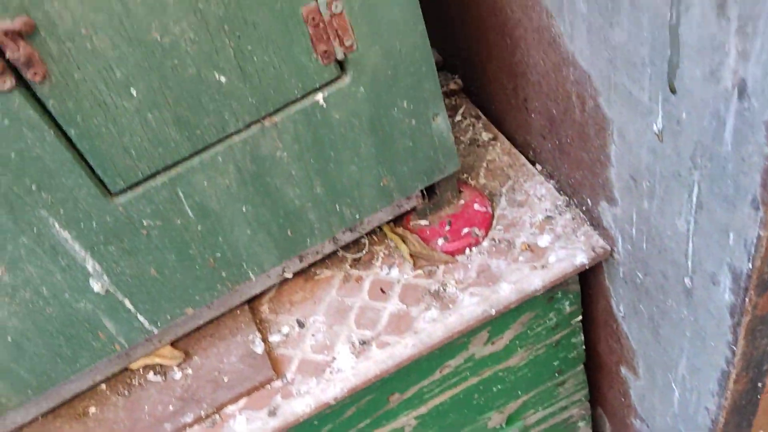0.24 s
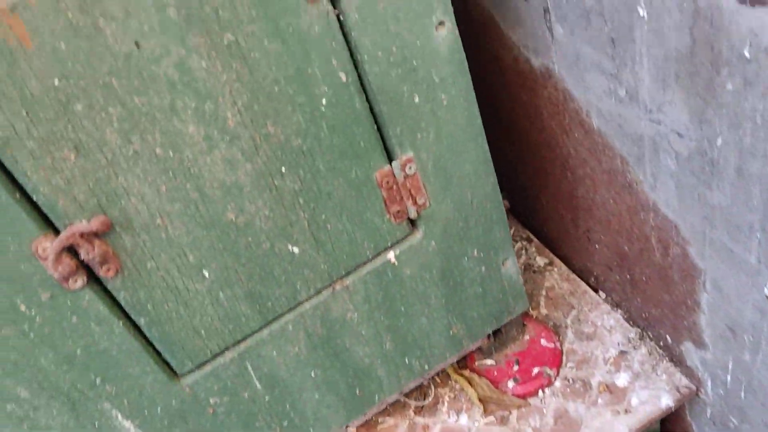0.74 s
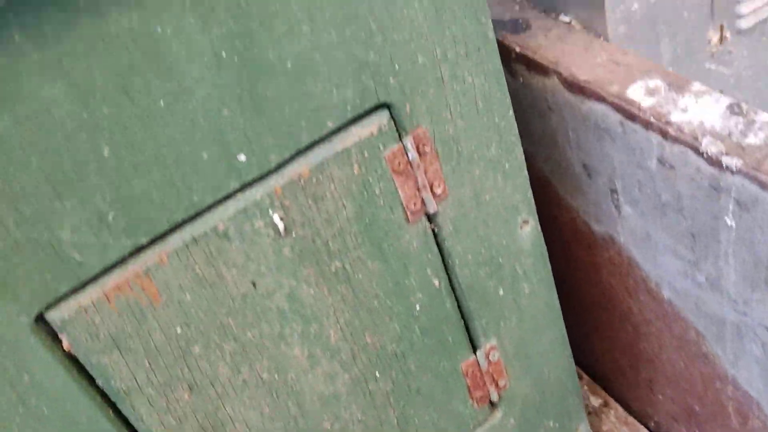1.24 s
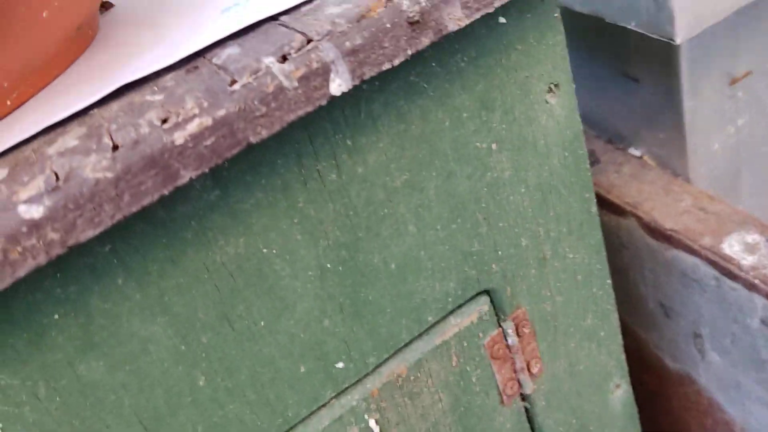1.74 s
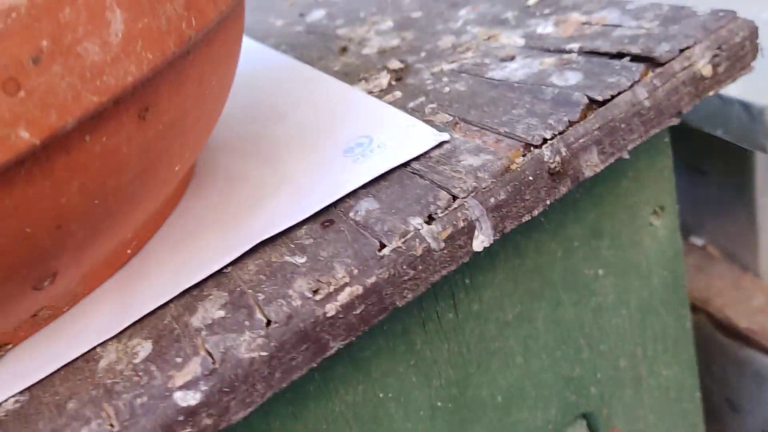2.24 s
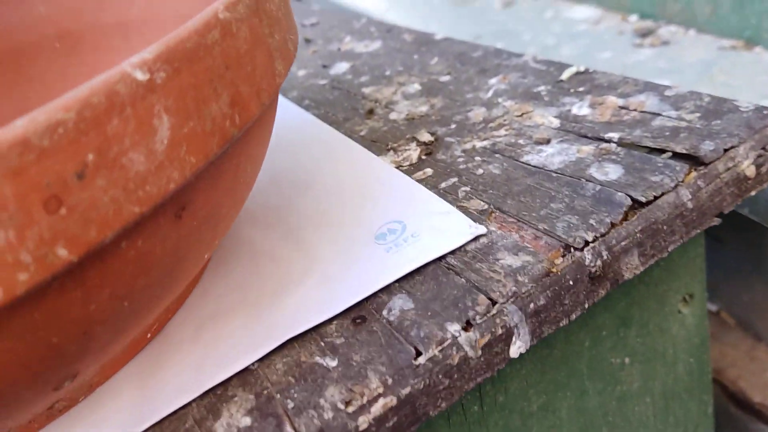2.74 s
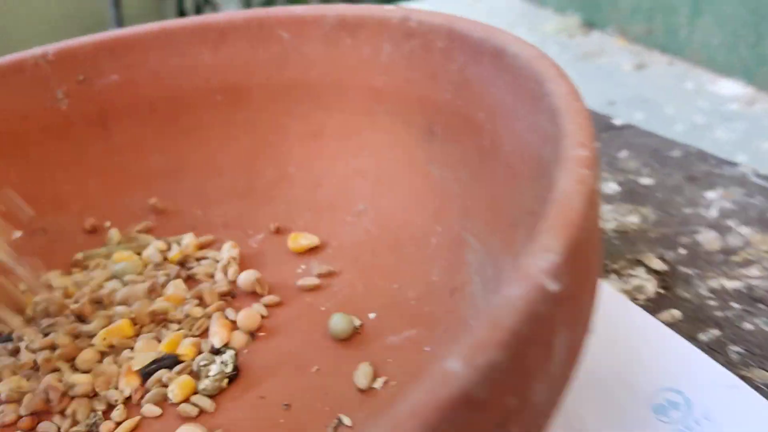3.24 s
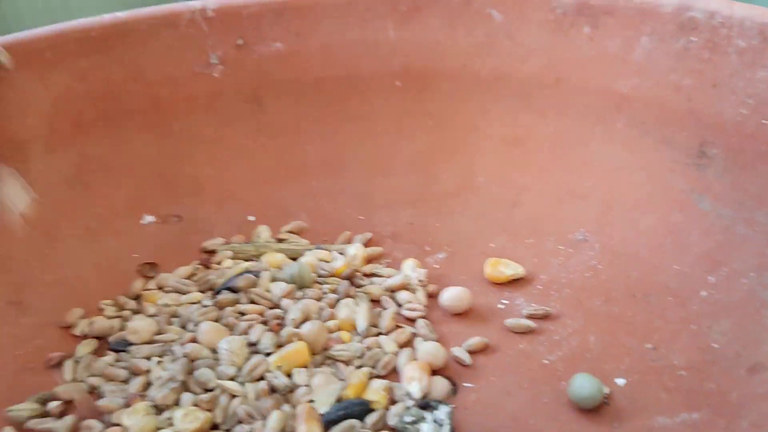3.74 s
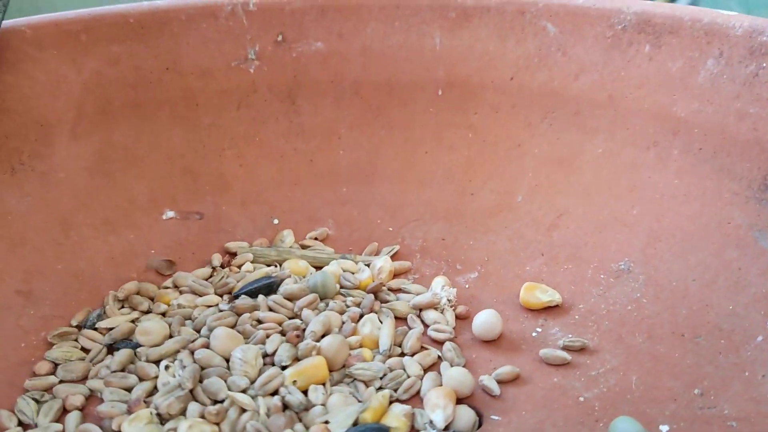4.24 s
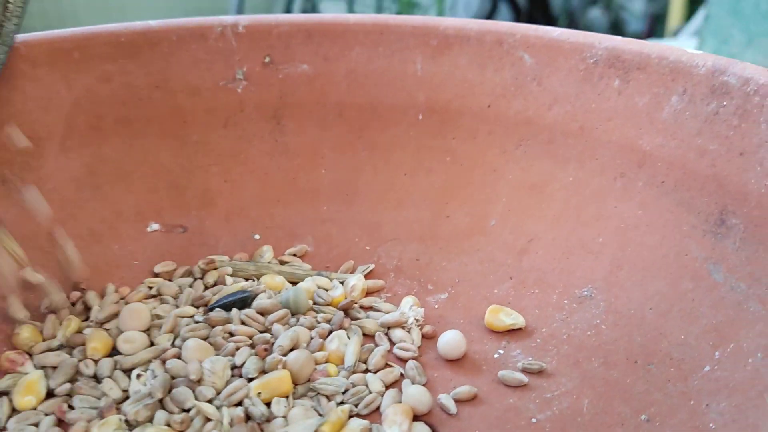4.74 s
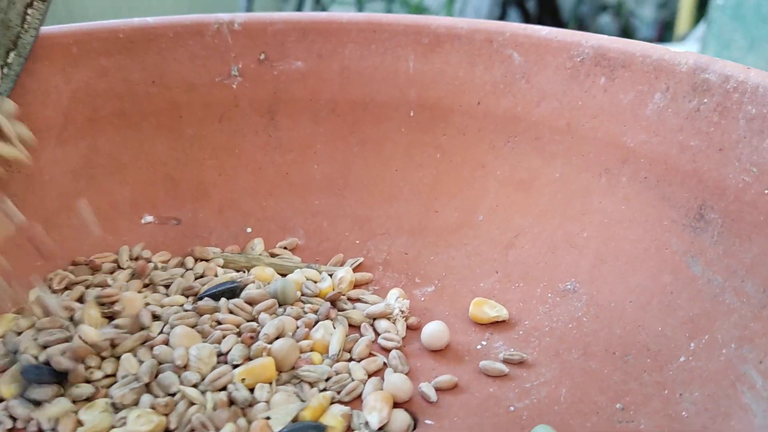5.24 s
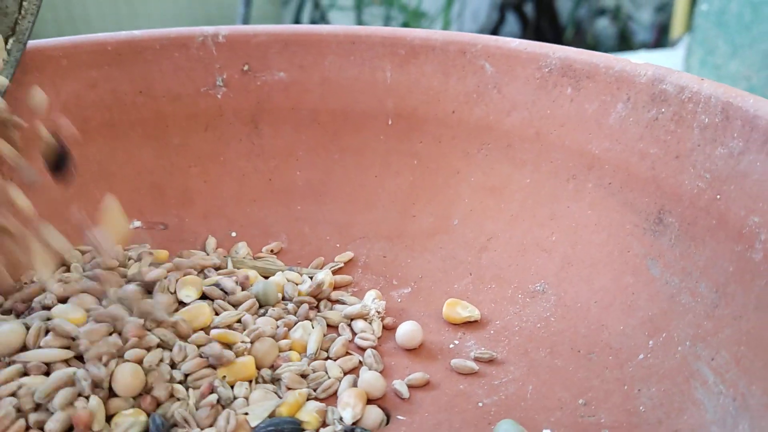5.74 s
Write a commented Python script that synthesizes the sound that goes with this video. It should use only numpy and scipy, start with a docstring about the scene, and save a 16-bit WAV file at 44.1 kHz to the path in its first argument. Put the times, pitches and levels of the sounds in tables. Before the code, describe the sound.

Dry mixed seed rustles in a scoop, then pours into a clay dish, pattering and ticking in a quiet yard.

```python
"""A rustle of dry mixed seed sliding in a scoop comes first, then a pour into a clay dish just right
of a two-microphone phone. Seeds rustle by colliding with each other; single kernels tick and excite
the modes of the clay, which dulls as seed covers it. A far dog yaps, a pigeon coos low, the phone
is bumped, and a quiet yard hums behind."""
import sys
import numpy as np
from scipy import signal
from scipy.fft import rfft, irfft
from scipy.io import wavfile
from scipy.ndimage import uniform_filter1d

SR = 44100
rng = np.random.default_rng(int(sys.argv[2]) if len(sys.argv) > 2 else 0)


def to_wav(sig):
    """Store sig (one row per channel, or 1-D mono) as 16-bit WAV at the path in sys.argv[1].

    Samples outside -1..1 are clipped; the rate is SR.
    """
    pcm = np.clip(np.atleast_2d(sig), -1, 1) * 32767
    pcm = np.round(pcm).astype(np.int16)
    wavfile.write(sys.argv[1], SR, pcm.T)  # frames by channels


N = 264929
T = np.arange(N) / SR

# Slides of seed as the scoop digs, tips or shakes:
# (end of swell [s], hold [s], rise [dB/s], fall [dB/s], fine level [dB], coarse above fine [dB])
SLIDES = [(0.166, 0.028, 283, 400, -54, 6), (0.291, 0.084, 463, 400, -36.5, -0.5),
          (0.362, 0.047, 207, 400, -47.5, 13.5), (0.47, 0.24, 302, 96, -39.5, -4.5),
          (0.827, 0.057, 210, 64, -24.5, -13.5), (1.31, 0.043, 157, 77, -47, -8.5),
          (1.578, 0.057, 96, 117, -29, -14), (1.673, 0.032, 114, 199, -26, -24),
          (1.776, 0.047, 129, 80, -29.5, -15), (2.092, 0.43, 75, 103, -43.5, -6),
          (2.712, 0.072, 125, 104, -30.5, -11), (2.93, 0.39, 61, 43, -33, -8.5),
          (3.74, 0.012, 207, 252, -36.5, -11), (3.968, 0.14, 150, 300, -49.5, -7),
          (4.447, 0.033, 225, 59, -47, -2.5), (4.617, 0.17, 156, 64, -37, -10),
          (5.017, 0.16, 57, 40, -44.5, -4), (5.192, 0.025, 67, 42, -37.5, -11.5),
          (5.36, 0.03, 128, 73, -30, -9.5), (5.514, 0.039, 120, 138, -31.5, -15),
          (5.654, 0.029, 206, 106, -25, -14), (5.886, 0.039, 68, 76, -33, -10.5)]
# Spectra of fine seed, coarse kernels and a contact's snap: (frequency [Hz], relative level [dB])
FINE_SPECTRUM = [(1000, -42.5), (2500, -15), (3300, -11), (4200, -7), (6000, 0.5), (7200, 0), (8500, 0),
                 (9700, 5), (12000, -3.5), (14500, -14)]
COARSE_SPECTRUM = [(500, -16.5), (900, -10.5), (1250, -12.5), (1600, -0.5), (2200, 2.5), (2800, -6),
                   (3400, -0.5), (5000, -3), (9000, -11.5)]
SNAP_SPECTRUM = [(1500, -20), (2500, -8), (4000, -2), (7000, 3), (8700, -2), (11000, 4), (14500, 4)]
# Ticks in the scoop: (time [s], relative level [dB], left minus right [dB])
SCOOP_TICKS = [(.3481, -30, 13), (.4566, -31, -11), (.5389, -18.5, -13), (.5781, -25.5, -5),
               (.6167, -13.5, -6.5), (.6459, -15, -2), (.6902, -8, -7), (.7023, -16, 3), (.7565, -34, -1),
               (.7676, -10.5, -8), (.827, -18, -13), (.87, -18, -18), (.9366, -20, -15), (1.0037, -14, -5),
               (1.0156, -15, -3), (1.045, -16.5, -1), (1.0708, -20, -3), (1.1065, -27, -8),
               (1.1457, -26.5, -7), (1.2518, -31, -7), (1.2664, -19, -4), (1.3343, -22, -8),
               (1.4274, -30, -14), (1.4474, -22, -2), (1.5159, -19.5, -14.5), (1.6931, -14.5, -4),
               (1.7247, -28, -12), (1.7923, -16, -11), (1.8109, -15.5, -2), (1.8784, -19, 6),
               (1.9114, -20, 1), (1.9357, -25.5, -11), (2.0165, -26, -3)]
# Kernels striking the clay: (time [s], relative level [dB], ring of each of four mode families
# from low to high against that level [dB], left minus right [dB])
KERNEL_IMPACTS = [(2.0317, -9.5, -5.5, -30.5, -11.5, -10.5, -5.5),
                  (2.0975, -17.5, -14, -23, -13.5, -20, -10), (2.243, -24.5, -9, -40, -20, -27, -5),
                  (2.263, -40, 7.5, -40, -8, -28, 1), (2.2945, -32.5, 4, -9, -4, -25, -2),
                  (2.3131, -19.5, -1, -20, -5.5, -17.5, -10), (2.3695, -26, -12, -20, -7, -15, -10),
                  (2.3876, -32.5, 9, -11, -15, -29, -2), (2.3973, -30, -40, -15, -0.5, -33, -10),
                  (2.454, -27, -15, -28, -21, -16, -5), (2.4882, -17, -13, -19, -16.5, -21, -1),
                  (2.5228, -24.5, -26, -18.5, -21, -19, -5), (2.561, -11.5, -44, -41, -30, -17, -4),
                  (2.6028, -30, -28, -33, -25, -19, -9), (2.627, -29, -16, -15, -7, -14, 1),
                  (2.6615, -10.5, -18, -17, -8.5, -23, -5), (2.742, -20.5, -23, -10, 0, -11, -1),
                  (2.7546, -6, -12, -19, -6.5, -17.5, 1), (2.8105, -8.5, -12, -10.5, -7, -22, -2),
                  (2.839, -26, -3.5, -8, -5, -21, -4), (2.847, -15.5, -39, -16, -1, -13.5, -3),
                  (2.8759, -13, -5.5, -10.5, -3, -28, -8), (2.8957, -11, -44, -38, -10, -23, -3),
                  (2.912, -10, -6.5, -16, -6, -15, -5), (2.9194, -7, -14, -14.5, -11, -27, -3),
                  (2.948, -19, -8, -9, -8, -13, -1), (2.977, -18.5, 0.5, -4.5, -5.5, -29, 1),
                  (3.0125, -20, -16, -3.5, -4, -13, -7), (3.0305, -10.0, -30, -18, -4, -18, -12),
                  (3.0684, -16.5, -6, -25, -6, -22, -11), (3.093, -17.5, -3, -40, -6, -20, -12),
                  (3.101, -16.5, -6, -33, -40, -18, -13), (3.121, -14, -8.5, -15, -11, -26, -10),
                  (3.1622, -17.5, -2.5, -15, -22, -33, -2), (3.3286, -17, -29, -17, -18, -23, -14),
                  (3.3855, -23.5, -14, -20, -12, -14, -12), (3.405, -20, -18, -12, -16, -14, -8),
                  (3.4244, -10.5, -28, -28, -40, -40, -8.5), (3.4536, -22, -40, -32, -35, -31, -10),
                  (3.4803, -17.5, -30.5, -23, -20.5, -18, -10), (3.4845, -26, -26, -9, -12, -40, -8),
                  (3.506, -9.5, -37, -28.5, -25, -18.5, -15), (3.5336, -33, -29, -40, -25, -22, -6),
                  (3.5628, -29, -9, -17, -5, -15, -8), (3.5668, -16.5, -40, -40, -20, -32, -11),
                  (3.6143, -28.5, -29, -12, -7.5, -13, -8), (3.653, -23.5, -17.5, -15, -9.5, -16.5, -3),
                  (3.685, -20.5, -24.5, -24, -10, -13, -11), (3.695, -6.5, -36, -32, -24, -25.5, 0),
                  (3.7166, -21.5, -36, -20, -9, -13, -9), (3.7463, -17.5, -48, -36, -17.5, -22, -7),
                  (3.7741, -17.5, -30, -22, -15, -14.5, -9), (3.7987, -42, -18, -13, -2, -15, -3),
                  (3.836, -23, -26, -19, -24, -32, -2), (3.849, -30, -40, -38, -10, -11, -6),
                  (3.8708, -19.5, -40, -15, -25, -29, -7), (3.8705, -25.5, -18, -20, -3, -20, -3),
                  (3.9056, -24, -26, -28, -15, -13, -7), (3.9494, -13.5, -42, -39, -22, -20, 1),
                  (3.964, -28, -38, -24, -8, -25, -7), (4.0525, -18, -44, -30, -27, -38, -8),
                  (4.067, -30, -36, -21, -5, -11, -1), (4.097, -32.5, -33, -21, -11, -13, -6),
                  (4.1875, -23.5, -36, -21, -10.5, -10, -2), (4.1981, -21, -35, -29, -18, -19, -3),
                  (4.2289, -26.5, -54, -23, -7, -16, -6), (4.2343, -22.5, -33, -29, -24, -16.5, 6),
                  (4.281, -43, -40, -31, -7, -19, -2), (4.3127, -25, -27, -30, -10.5, -16.5, -7),
                  (4.511, -26.5, -36, -36, -19, -19, 7), (4.5548, -28, -34, -28, -11.5, -19, 3),
                  (4.578, -16.5, -26, -27, -18, -13, -6), (4.59, -13, -31, -22, -10, -20, 1),
                  (4.608, -19.5, -44, -35, -7, -18, -3), (4.6302, -22.5, -40, -21, -10, -10, 0),
                  (4.6636, -20.5, -38, -31, -18, -15, -6), (4.6846, -21, -44, -33, -13, -12.5, -1),
                  (4.7083, -25, -36, -27, -21, -14, 1), (4.7248, -22, -38, -25, -15, -13, 2),
                  (4.7452, -13, -39, -25, -16.5, -16.5, -5), (4.7913, -20, -30, -36, -40, -40, -4),
                  (4.8375, -25.0, -42, -28, -13, -16, -4), (4.8669, -17.5, -34, -29, -16, -14.5, -6),
                  (4.898, -18, -38, -27, -20, -24, -6), (4.911, -21, -34, -33, -22, -18, 5),
                  (4.9465, -29.5, -33, -29, -7, -12, -1), (4.9613, -20.5, -25, -17, -10.5, -14, -1),
                  (5.043, -23, -35, -40, -26, -28, 3), (5.065, -26, -31, -32, -22, -21, -9),
                  (5.164, -36, -25, -25, -11, -24, -8), (5.175, -22, -35, -40, -20, -23, -3),
                  (5.1911, -21.5, -29, -20, -18, -21, 10), (5.2072, -19.5, -32, -29, -12.5, -18, -8),
                  (5.3813, -28, -32, -25, -15, -29, 4), (5.4946, -30, -32, -12, -14, -19, 2),
                  (5.553, -19, -37, -40, -40, -40, 3), (5.5997, -26, -34, -22, -13, -26, 9),
                  (5.616, -27, -29, -40, -40, -16, 1), (5.7253, -20, -32, -38, -24, -19, -12),
                  (5.749, -21, -22, -25, -23, -27, -14), (5.7687, -26, -42, -36, -16, -36, -11),
                  (5.8644, -25.5, -34, -24, -17, -18, -10), (5.965, -24, -27, -39, -42, -15, 0)]
# Natural frequencies of the dish: (frequency [Hz])
MODE_HZ = [1908, 3025, 3110, 4170, 4390, 4910, 5280, 5880, 5955, 6220, 6550, 6995, 7660, 8430, 8580, 8720,
           9150, 9900, 10250, 10470, 10600, 12000, 12410, 13600, 14100]
# The same modes: (T60 [s], excitation when bare [dB], when heaped [dB], left minus right [dB])
DISH_MODES = [(0.043, -4, -35, 1.5), (0.072, -10, -13.5, -5), (0.026, -11.5, -10, -8),
              (0.072, -14.5, -17, -11), (0.036, -10, -9.5, 10), (0.063, -20, -12.5, 3),
              (0.08, -11.5, -19, 6.5), (0.03, -8, -14, 14), (0.029, 0, -17, 0), (0.084, -18, -20, 14.5),
              (0.065, -13, -11.5, -5), (0.035, -22, -11.5, -7), (0.061, -21, -23.5, -6),
              (0.054, -24, -22, -5), (0.054, -23.5, -23, -9), (0.045, -15, -25, -9), (0.02, -45, -40, -4),
              (0.018, -25, -45, 20), (0.025, -16, -22, 5), (0.046, -19.5, -44, 1), (0.062, -24, -27, -24),
              (0.065, -58, -27.5, -13), (0.063, -22.5, -34, -20), (0.03, -41, -31, -6),
              (0.023, -21, -47, 17)]
# Drive of the stream on the clay: (time [s], level [dB])
CLAY_DRIVE = [(2.0, -65), (2.1, -51), (2.72, -45.5), (2.8, -33), (3.15, -29), (3.45, -43.5), (3.92, -55),
              (4.3, -76), (4.5, -52), (4.75, -49), (5.25, -40.5), (6.0, -43)]
# Hum of the air in the scoop: (time [s], level [dB])
CAVITY_HUM = [(.25, -62), (.302, -42.5), (.364, -66), (.474, -47), (.58, -55.5), (.92, -53.5), (1.1, -78)]
# Knocks of the digging scoop, and bumps on the phone: (time [s], level [dB], frequency [Hz])
SCOOP_KNOCKS = [(.292, -49, 445), (.321, -27, 1900), (.367, -28, 2500)]
PHONE_BUMPS = [(3.943, -26.5, 169), (4.009, -31, 400), (4.964, -24, 177), (5.225, -17.5, 227)]
# Calls of the dog and the pigeon: (start [s], duration [s], pitch [Hz], level [dB])
DOG_YAPS = [(3.2, 0.092, 840, -54.5), (3.49, 0.076, 820, -49.5), (3.79, 0.1, 813, -54),
            (4.135, 0.078, 807, -53.5), (4.73, 0.078, 820, -61)]
PIGEON_COOS = [(5.03, .16, 272.5, -57.5), (5.29, 0.19, 268, -56.5), (5.61, 0.145, 267.3, -56)]
# Spectra of the yard's hum and the air's hiss: (frequency [Hz], relative level [dB])
YARD_SPECTRUM = [(12, -33), (20, 14), (70, -16), (103, -9.5), (133, -25.5), (155, -11), (216, -20),
                 (256, -13), (340, -21.5), (370, -22), (517, -24), (1100, -25), (1430, -84), (2420, -120)]
AIR_SPECTRUM = [(600, -16), (1100, -2), (2300, 5.5), (3300, -2.5), (14500, -7)]
# Resonances of the left, then the right microphone port: (frequency [Hz], bandwidth [Hz], boost [dB])
PORT_RESONANCES = [
    [(10700, 900, 11), (12600, 2600, 6)],
    [(8700, 700, 17)],
]

FAMILY_EDGES_HZ = (2500, 3500, 7300)
FAMILY_DB = (2.46, 4.55, 2.13, 0.37)  # added loudness of each mode family's ring when a kernel strikes
HEAPING_S = (3.15, 3.7)  # the heap grows over the clay between these times
NOISE_LAG_S, DISH_LAG_S = 0.000417, 0.00036  # sound reaches the left port later


def seed_stream():
    """Granular noise: many collisions merge, fine seed as a crackle, coarse kernels lower and sparser."""
    fine, coarse = slide_envelopes()
    hiss = noise(FINE_SPECTRUM, coherence=0.012)
    shared = patter(per_second=4500, spread_db=2.5, t60=.008)
    grains = 0
    for band_hz in ((800, 3500), (3500, 6500), (6500, 10000), (10000, 16000)):
        band = signal.sosfilt(signal.butter(2, band_hz, "band", fs=SR, output="sos"), hiss)
        own = patter(per_second=1600, spread_db=2.6, t60=.012)
        grains = grains + band * (shared + own) / 2
    knocks = patter(per_second=1400, spread_db=2.2, t60=.028) * noise(COARSE_SPECTRUM, coherence=0.25)
    return fine * pan(-3)[:, None] * grains + coarse * pan(1)[:, None] * knocks


def slide_envelopes():
    """Incoherent sources add in power: fine and coarse gains of slides that swell, hold and fade."""
    full, hold, rise, fall, db, coarse_db = np.transpose(SLIDES)[:, :, None]
    t = T[::64]
    power = undb(2 * (db - rise * np.maximum(full - t, 0) - fall * np.maximum(t - full - hold, 0)))
    fine = power.sum(axis=0) + undb(-63.5) ** 2  # seed never lies quite still
    coarse = (power * undb(2 * coarse_db)).sum(axis=0)
    return np.sqrt(np.interp(T, t, fine)), np.sqrt(np.interp(T, t, coarse))


def patter(per_second, spread_db, t60):
    """Shot noise: the envelope of seeds landing at random, a few much harder than most."""
    count = int(per_second * N / SR)
    hits = impulses(rng.random(count) * N / SR, undb(spread_db * rng.exponential(size=count)))
    return unit_rms(resonate(hits, t60).real)


def contacts(rows, t60, crack_db, snap_db):
    """A brief impact is broadband: a bright snap, a dry crack and a faint rattling tail."""
    crack, snap = np.zeros((2, 2, N))
    t = T[:SR // 8]
    rattle = undb(-23 - 60 * t / 0.09)
    crack_shape = (1 - np.exp(-t / 0.0013)) * (undb(-60 * t / t60) + rattle)
    snap_shape = (1 - np.exp(-t / 0.0001)) * undb(-60 * t / 0.0033)
    for start, db, *_, pan_db in rows:
        i = int(start * SR)
        gain = undb(db) * pan(pan_db)[:, None]
        crack[:, i:i + len(t)] += (gain * crack_shape)[:, :N - i]
        snap[:, i:i + len(t)] += (gain * snap_shape)[:, :N - i]
    return (undb(crack_db) * crack * noise(FINE_SPECTRUM, coherence=0.49)
            + undb(snap_db) * snap * noise(SNAP_SPECTRUM, coherence=0.8))


def clay_dish():
    """Modal superposition: every blow lands elsewhere, so it excites the clay's modes in new shares."""
    blow_s, blow_db, *ring_db, _ = np.transpose(KERNEL_IMPACTS)
    drive_db, gate = level_curve(CLAY_DRIVE)
    drop_s = rng.random(1500) * N / SR
    drop_size = undb(2.5 * rng.exponential(size=len(drop_s)))
    drop_index = (drop_s * SR).astype(int)
    families = np.searchsorted(FAMILY_EDGES_HZ, MODE_HZ)
    weights = np.array([undb(np.interp(blow_s, HEAPING_S, mode[1:3])) for mode in DISH_MODES])
    weights *= undb(3 * rng.standard_normal((len(blow_s), len(DISH_MODES))).T)
    out = np.zeros((2, N))
    for hz, family, weight, mode in zip(MODE_HZ, families, weights, DISH_MODES):
        t60, bare_db, heaped_db, pan_db = mode
        # low modes build up more slowly as the wave spreads, and the stream drives them less
        spread_t60, trim_db = (0.018, -1.5) if hz < 3500 else (0.006, 0)
        polarity, skew = rng.standard_normal((len(blow_s), 2)).T
        share = weight / np.sqrt(np.sum(weights[families == family] ** 2, axis=0))
        blows = undb(blow_db + ring_db[family] + FAMILY_DB[family]) * share * np.sign(polarity)
        cover_db = np.interp(T, HEAPING_S, (bare_db, heaped_db))
        drops = (undb(drive_db + trim_db + cover_db) * gate)[drop_index] * drop_size
        common = impulses(drop_s, drops * rng.standard_normal(len(drops)))
        for side, sign in enumerate((1, -1)):
            # each port hears the mode's pattern from its own angle
            own = impulses(drop_s, .5 * drops * rng.standard_normal(len(drops)))
            force = impulses(blow_s, blows * undb(2.82 * sign * skew)) + common + own
            build_up = resonate(force, spread_t60, hz) * np.log(1000) / (spread_t60 * SR)
            ring = resonate(build_up, t60, hz).imag
            # the second family shows opposite faces to the two ports
            out[side] += pan(pan_db)[side] * ring * (sign if family == 1 else 1)
    out[0] = np.roll(out[0], int(DISH_LAG_S * SR))
    return signal.sosfilt(signal.butter(4, 1500, "high", fs=SR, output="sos"), out)


def bench_rumble():
    """Forced vibration: the bench under the dish rumbles as the clay is driven."""
    drive_db, gate = level_curve(CLAY_DRIVE)
    rumble = noise([(60, -59), (100, 4), (140, -11), (270, -2), (400, -20.5)], coherence=0.97)
    return undb(drive_db - 22) * gate * rumble


def scoop_cavity():
    """Cavity resonance: sliding seed drives two close modes of the air in the scoop."""
    db, gate = level_curve(CAVITY_HUM)
    push = noise([(100, 0), (2000, 0)], coherence=0.94)
    hum = resonate(push, t60=0.17, hz=424.6).imag + 1.35 * resonate(push, t60=0.094, hz=472).imag
    return undb(db) * gate * unit_rms(hum)


def thumps(rows, cycles):
    """Damped oscillation: a knocked body rings, falling 60 dB in the given number of cycles."""
    return sum(undb(db) * resonate(impulses(np.array([start]), [1.]), cycles / hz, hz).imag
               for start, db, hz in rows)


def animal_calls(rows, glide, swell_power, overtone_db, flutter_depth):
    """Modulated tones: a fundamental and its octave glide in pitch, swell, flutter and fade."""
    out = 0
    flutter = 1 + flutter_depth * unit_rms(uniform_filter1d(rng.standard_normal(N), size=500))
    for start, duration, hz, db in rows:
        progress = np.clip((T - start) / duration, 0, 1)
        pitch = hz * (1 + glide * (np.sin(2.05 * progress) - .7))
        phase = 2 * np.pi * np.cumsum(pitch) / SR
        swell = np.abs(np.sin(np.pi * progress)) ** swell_power
        tone = np.sin(phase) + undb(overtone_db) * np.sin(2 * phase)
        out = out + np.sqrt(2) * undb(db) * swell * flutter * tone
    return out


def yard_ambience():
    """Stationary noise: a low, partly coherent hum under a faint, diffuse hiss."""
    hum = undb(-50) * pan(-0.77)[:, None] * noise(YARD_SPECTRUM, coherence=0.45)
    return hum + undb(-65) * noise(AIR_SPECTRUM, coherence=0.028)


def noise(spectrum, coherence):
    """Partly coherent stereo noise of a (frequency [Hz], level [dB]) shape; the shared part lags left."""
    hz, db = np.transpose(spectrum)
    f = np.maximum(np.arange(N // 2 + 1) * SR / N, 1)
    shared, left, right = rfft(rng.standard_normal((3, N)))
    delay = np.exp(-2j * np.pi * f * NOISE_LAG_S)
    coherent = np.sqrt(coherence) * np.array([shared * delay, shared])
    diffuse = np.sqrt(1 - coherence) * np.array([left, right])
    gain = undb(np.interp(np.log(f), np.log(hz), db))
    return unit_rms(irfft((coherent + diffuse) * gain, N))


def resonate(x, t60, hz=0):
    """One-pole response: an exponential decay, or a mode ringing at hz."""
    return signal.lfilter([1], [1, -np.exp((2j * np.pi * hz - np.log(1000) / t60) / SR)], x)


def impulses(times, sizes):
    """Impulse train with the given times [s] and sizes."""
    return np.bincount(np.clip((times * SR).astype(int), 0, N - 1), sizes, N)


def level_curve(rows):
    """Interpolated level [dB], and a smooth gate that closes outside the table's span."""
    times, db = np.transpose(rows)
    inside = (T > times[0]) & (T < times[-1])
    return np.interp(T, times, db), uniform_filter1d(1. * inside, size=400)


def pan(db):
    """Left and right gains for a level difference."""
    return undb(np.array([db, -db]) / 2)


def unit_rms(x):
    """Normalisation to unit mean power."""
    return x / np.sqrt(np.mean(x ** 2))


def undb(db):
    """Amplitude ratio of a level in decibels."""
    return 10 ** (np.asarray(db) / 20)


def scene():
    """Linear superposition of seed, dish, scoop, bumps, animals and yard at the two microphones."""
    ticks = contacts(SCOOP_TICKS, t60=0.027, crack_db=-10.5, snap_db=-6.5)
    kernels = contacts(KERNEL_IMPACTS, t60=0.032, crack_db=-14, snap_db=-3)
    knocks = thumps(SCOOP_KNOCKS, cycles=27) + thumps(PHONE_BUMPS, cycles=0.7)
    yard = yard_ambience()
    dog = animal_calls(DOG_YAPS, glide=0.05, swell_power=0.84, overtone_db=-14.5, flutter_depth=0.45)
    pigeon = animal_calls(PIGEON_COOS, glide=-0.013, swell_power=0.4, overtone_db=-18, flutter_depth=0.46)
    pour = seed_stream() + ticks + kernels + clay_dish() + bench_rumble() + scoop_cavity()
    return pour + knocks + dog + pigeon + yard


def record(dry):
    """Port resonances colour the treble; band limits cut deep bass and top; saturation rounds peaks."""
    ports = []
    for x, resonances in zip(dry, PORT_RESONANCES):
        for hz, width, db in resonances:
            x = x + (undb(db) - 1) * signal.lfilter(*signal.iirpeak(hz, hz / width, SR), x)
        ports.append(x)
    ports = signal.sosfilt(signal.butter(3, 41, "high", fs=SR, output="sos"), ports)
    return signal.sosfilt(signal.ellip(10, .2, 60, 14250, fs=SR, output="sos"), np.tanh(ports))


dry = scene()
out = record(dry)
to_wav(out)
```